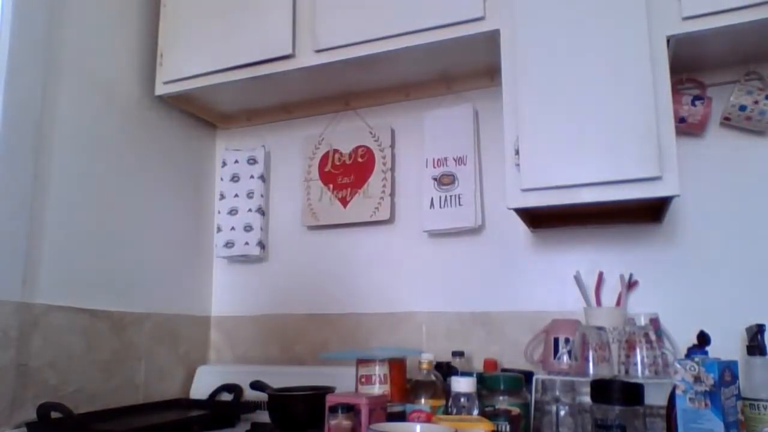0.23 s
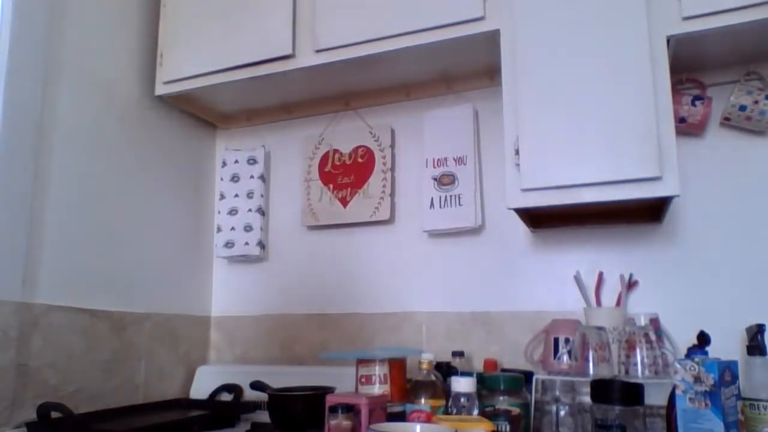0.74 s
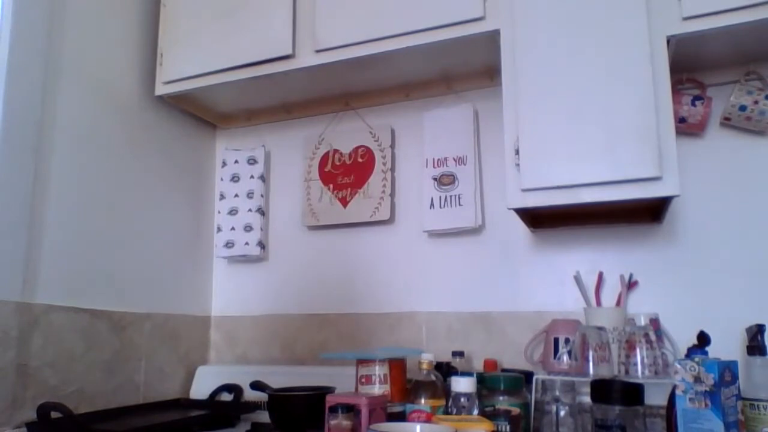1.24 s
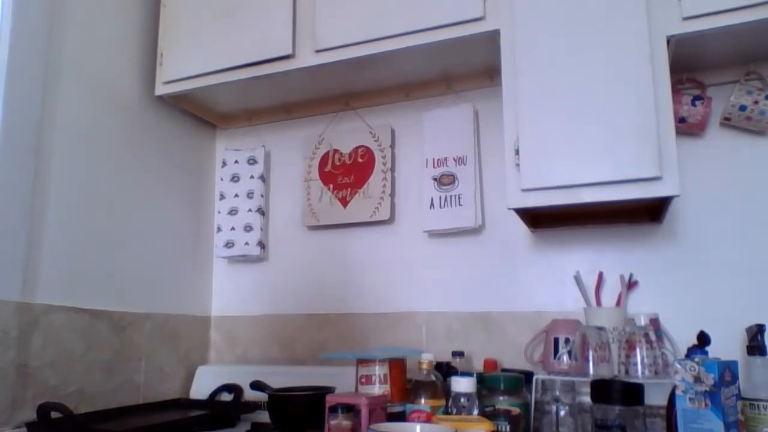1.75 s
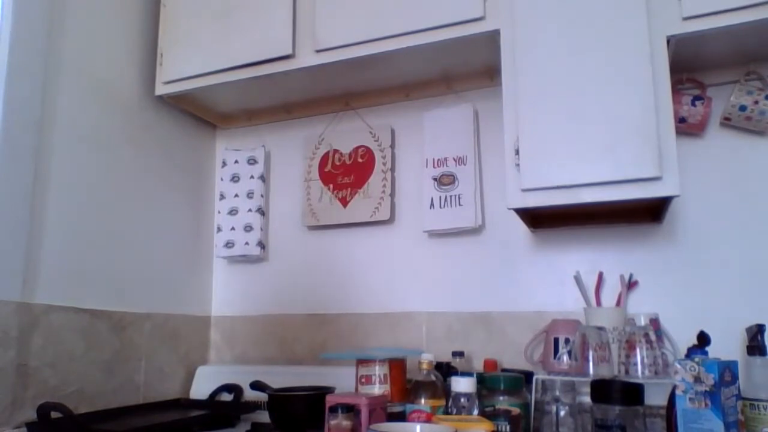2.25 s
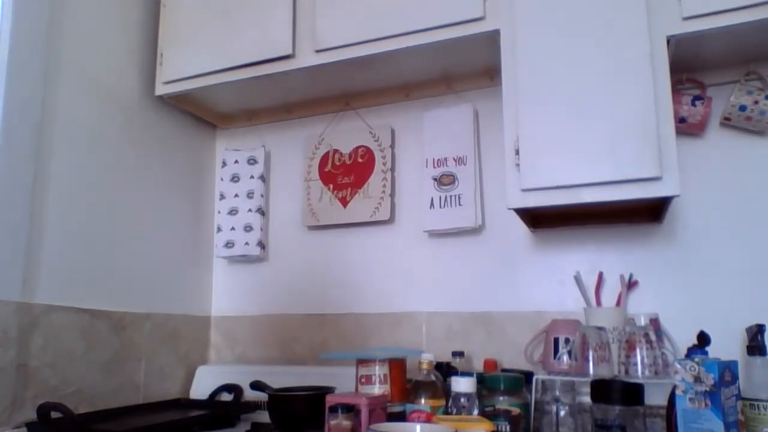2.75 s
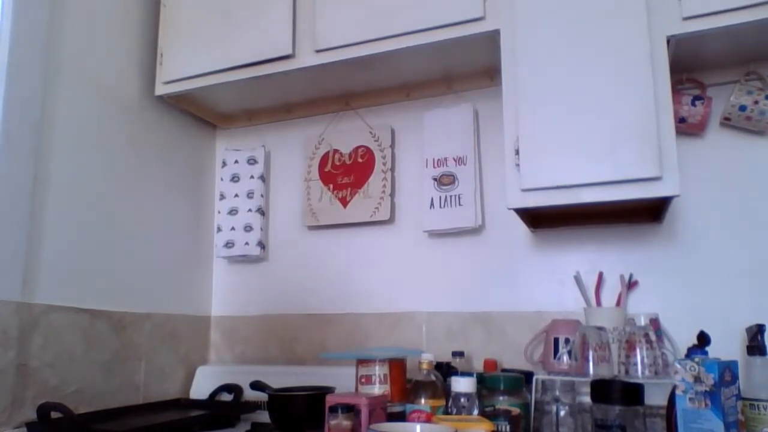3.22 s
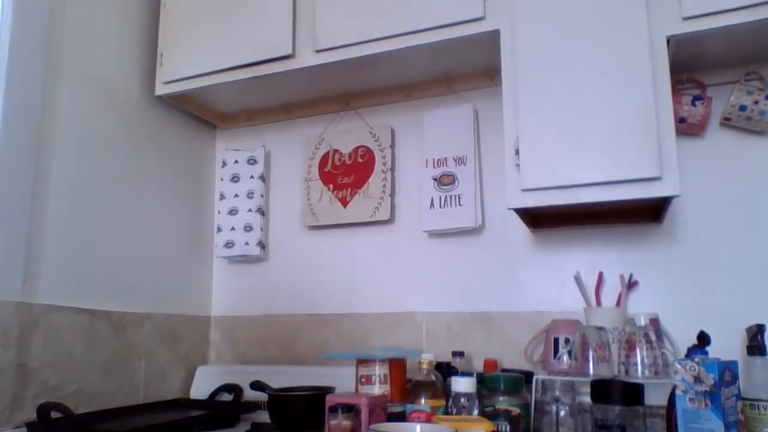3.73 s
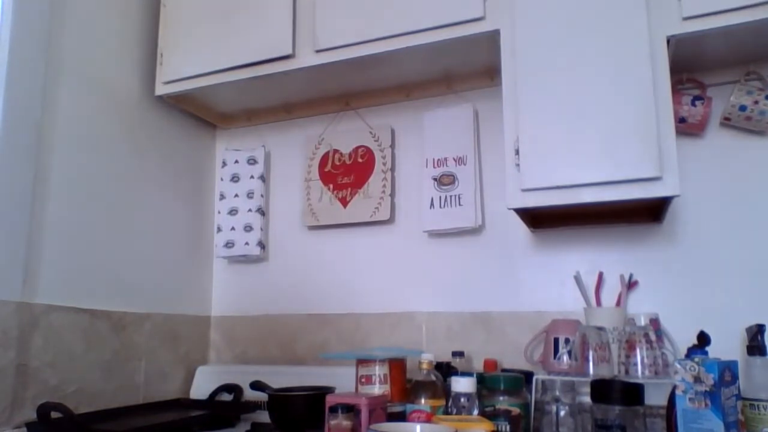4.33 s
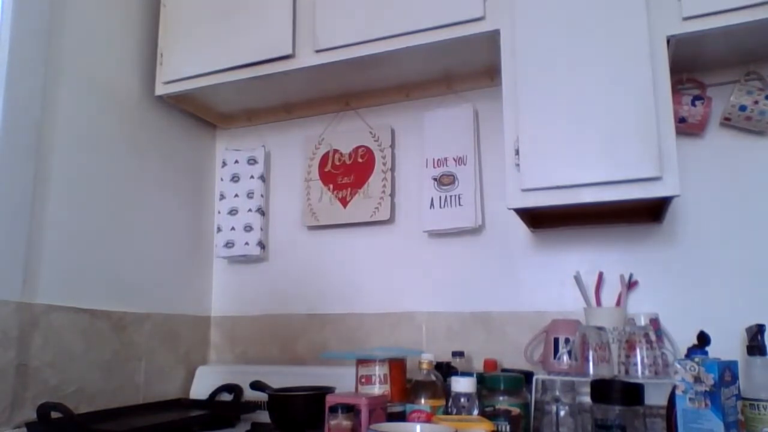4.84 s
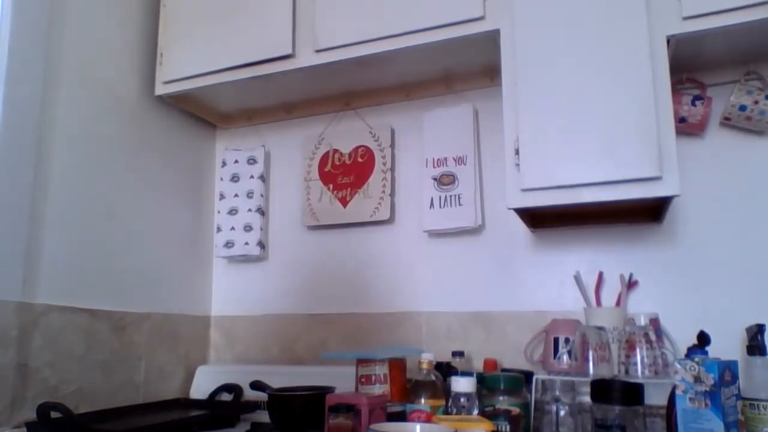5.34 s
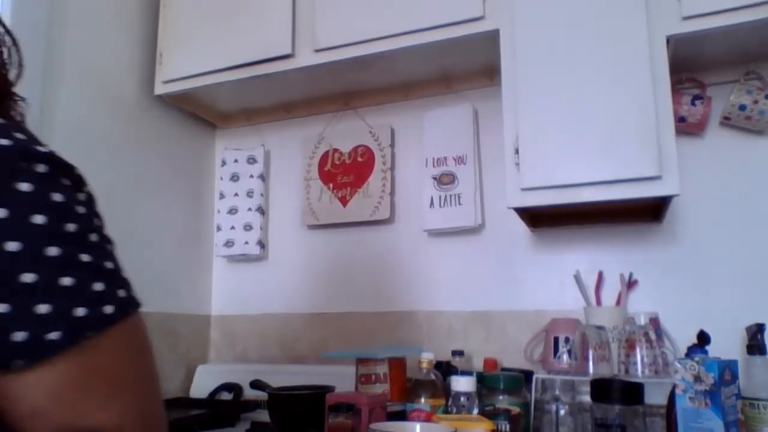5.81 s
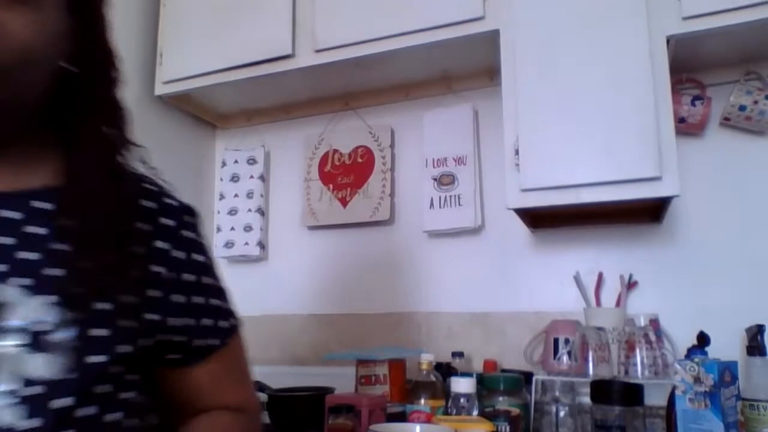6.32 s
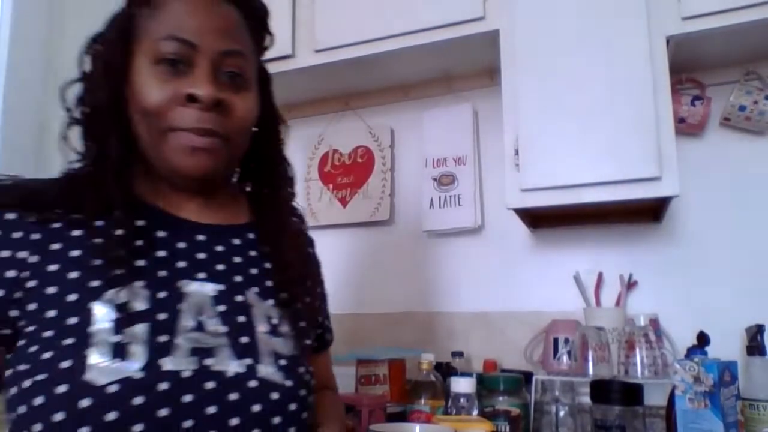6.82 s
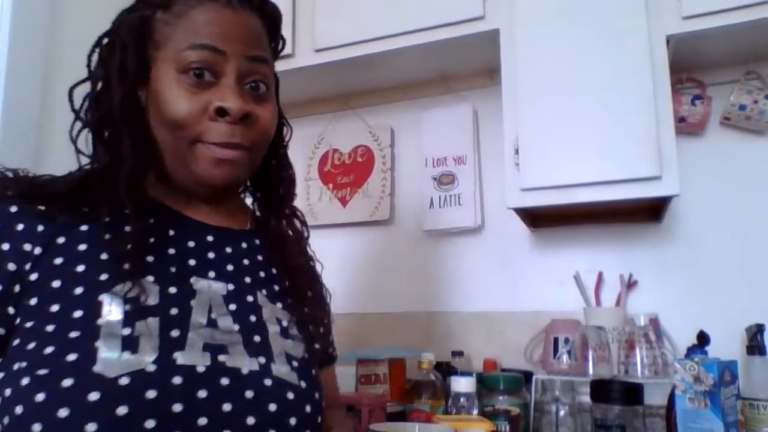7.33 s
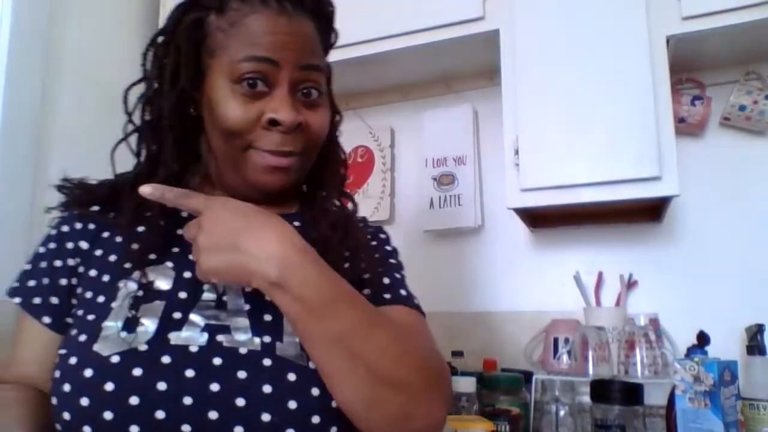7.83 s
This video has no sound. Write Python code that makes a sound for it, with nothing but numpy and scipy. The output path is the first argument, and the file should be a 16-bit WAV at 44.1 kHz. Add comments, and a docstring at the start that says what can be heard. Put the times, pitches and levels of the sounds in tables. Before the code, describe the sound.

Close to a laptop microphone in a hard-walled kitchen with faint rumble, hiss and hum. At 0 s the tail of a jar's drag across the counter fades and stops by 0.3, with a sharp hollow knock at 0.25 and smaller ones to 0.55. Near quiet follows, then soft taps and thuds from 1.3 to 2.2 as the jar is nudged and twisted, a faint tap at 2.9 and a snap at 3.45. At 3.8 a switch clunks and the blender starts, drumming and whirring up to a high whine by 4.8. At 5.0 ice jams the blades: pitch drops, with a heavy growling crunch around 5.25 and a counter thump at 5.5. Rattling, splintering ice continues; the motor races freer around 6.3 to 6.6, bogs into the loudest, distorted crashes near 7.1, recovers by 7.5, crunches again at 7.7 and runs on, rising, to the end at 8.

```python
"""A blender on a kitchen counter, close to a laptop's microphones: shaft tones, slot whine, fan noise and ice, all
tied to one shaft whose speed falls and rises as the churn swells and thins. Before the motor starts, the jar drags,
then knocks as it is set down, nudged and twisted on: bursts of noise ring the jar, thud and snap.
Hard walls answer with a decaying tail, over rumble, hiss and a faint hum; a side layer, mainly treble, widens
the stereo, and the loudest moments overload the input."""
import sys
import numpy as np
from scipy import signal
from scipy.fft import rfft, irfft, next_fast_len
from scipy.io import wavfile
from scipy.ndimage import map_coordinates

SR = 44100
rng = np.random.default_rng(int(sys.argv[2]) if len(sys.argv) > 2 else 0)


def bounce(signal):
    """Save signal as a 16-bit WAV file at the path given by the first command-line argument."""
    frames = np.transpose(np.atleast_2d(signal))
    limited = np.clip(frames, -1, 1)
    pcm = np.round(limited * 32767).astype(np.int16)
    wavfile.write(sys.argv[1], SR, pcm)


N = 355887
T = np.arange(N) / SR

# still kitchen and microphone hiss: (frequency [Hz], relative density [dB per Hz])
AIR_SPECTRUM = [(8.8, -30), (15, 4), (48, -1.5), (97, -10), (429, -15.5), (704, -21.5), (839, -22),
                (943, -24), (1380, -24), (2260, -32.5), (6280, -37), (14600, -34.5), (16000, -38)]
# a far appliance: (frequency [Hz], level [dB, scales the sine's peak])
HUM_TONES = [(285, -67), (431, -78), (829, -67)]
# the jar dragging on the counter: (frequency [Hz], relative density [dB per Hz])
DRAG_SPECTRUM = [(71, -46), (120, -21), (231, -3.5), (418, -16.5), (512, -11), (668, -22), (745, -15),
                 (1190, -19.5), (1550, -18.5), (5000, -43), (6500, -38), (11000, -120)]
# knocks of jar, lid and switch: (time [s], level driving the jar [dB], thud against it [dB],
# snap against it [dB], pitch of ring [Hz], pitch of thud [Hz])
HANDLING_KNOCKS = [(0.231, -31, -4, -20, 1500, 332), (0.242, -14.5, -7.5, -24, 1730, 350),
                   (0.259, -19.5, -22, -20, 1030, 330), (0.351, -26, 3, -33.5, 950, 324),
                   (0.461, -27.5, 0.5, -37, 1120, 430), (0.514, -34, 6.5, -14, 3150, 267),
                   (0.542, -45, -1, 1, 3500, 260), (1.319, -48, -10, -15, 1800, 400),
                   (1.504, -39.5, 5.5, -19, 1210, 477), (1.599, -45, 4, -18, 1480, 490),
                   (1.76, -40.5, 1, 11, 1390, 450), (1.866, -41.5, -6, -17, 1440, 400),
                   (2.016, -40, -11, -15, 1610, 400), (2.104, -39, 2, -16, 1490, 300),
                   (2.124, -36.5, 8.5, -24, 1410, 271), (2.159, -34, -1, -14, 1350, 463),
                   (2.219, -44, -13, -16, 1090, 400), (2.861, -44, -5, -16, 750, 500),
                   (3.45, -36.5, -9, -1, 1560, 400), (3.807, -22, 1.5, -17, 1300, 307)]
# big lumps of ice strike the jar: (time [s], level driving the jar [dB], thud against it [dB], snap against it [dB])
ICE_LUMPS = [(3.959, -21, -2, -25), (4.019, -21, -4, -13), (4.279, -24.5, 6.5, -24), (5.214, -8, -18, -35),
             (5.455, -9, -20, -22), (5.564, -10, -31, -7), (5.628, -12, -18, -22), (5.864, -11, -1, 0),
             (5.933, -22, -10, 1), (6.356, -15, -15, -22), (6.657, -19, -7, -1), (7.01, -9.5, -2, -14),
             (7.121, -0.5, -1, -32), (7.157, 3.5, -24, -18), (7.261, -12, -4, -6), (7.312, -16, -10, -9),
             (7.559, -14, -8, -18), (7.649, -5.5, -7, -19), (7.776, -6, -6, -20)]
# pitch when ice strikes: (ring [Hz], thud [Hz])
LUMP_PITCHES = (1320, 318)
# time for a contact to fall 60 dB: ring, thud, snap [s]
CONTACT_T60 = [0.14, 0.16, 0.023]
# resonances of jar and base: (frequency [Hz], width [Hz], gain [dB])
JAR_MODES = [(172, 32, -4.5), (304, 18.4, 2.5), (390, 93, -10), (578, 180, -0.5), (668, 73, 1.5),
             (800, 170, -2.5), (1080, 53, -2), (1140, 34, -0.5), (1467, 64, -6.5), (1618, 153, -4.5),
             (2070, 450, -2.5), (2224, 450, -1.5), (3710, 980, -23.5)]
# decay of the walls' answer: (frequency [Hz], time to fall 60 dB [s])
KITCHEN_T60 = [(150, 0.41), (1000, 0.36), (4000, 0.33), (12000, 0.19)]
# side layer: (frequency [Hz], gain [dB])
SIDE_GAIN = [(100, -56.5), (3000, -57.5), (6000, -57.5), (9000, -10), (16000, 5)]
# shaft speed before its small jitter: (time [s], turns a second [Hz])
SHAFT_SPEED = [(3.85, 96.3), (4.07, 139.3), (4.28, 160), (4.42, 163.9), (4.6, 185.3), (4.82, 191.5),
               (4.93, 188.3), (5.07, 150.8), (5.14, 143.6), (5.3, 143), (5.45, 166.8), (5.62, 167.5),
               (5.83, 177.3), (5.97, 162.8), (6.07, 178.1), (6.3, 195.8), (6.42, 186.2), (6.6, 197.4),
               (6.7, 193.7), (6.84, 167), (6.97, 165.7), (7.14, 148.3), (7.21, 146.8), (7.37, 176.5),
               (7.49, 192.6), (7.59, 183.1), (7.69, 169.5), (7.78, 160), (7.87, 163.8), (8.07, 192.4)]
# steady churn of the ice: (time [s], grinding level [dB])
ICE_CHURN = [(3.8, -36), (3.98, -27), (4.26, -30), (4.65, -28), (4.9, -26), (5.1, -13), (5.37, -22),
             (5.62, -19), (5.75, -20), (6.0, -22.5), (6.28, -25.5), (6.5, -23), (6.8, -19), (7.0, -19),
             (7.25, -26.5), (7.46, -23), (7.7, -17.5), (8.07, -20.5)]
# ice jams the blades: (start of full force [s], grinding level [dB], build-up time constant [s], hold [s])
ICE_JAMS = [(5.02, -19.5, 0.032, 0.026), (5.108, -31, 0.061, 0.043), (5.232, -4.5, 0.029, 0.047),
            (5.324, -18.5, .01, 0.0069), (5.469, -12.5, 0.047, 0.028), (5.572, -15, .015, 0.014),
            (5.63, -18, 0.034, 0.022), (5.87, -18.5, 0.008, .02), (5.951, -14.5, .015, 0.015),
            (6.384, -17.5, 0.044, 0.032), (6.726, -20, 0.076, .02), (6.909, -16.5, 0.058, 0.013),
            (7.07, -10.5, 0.069, .07), (7.155, -9, .015, .03), (7.72, -11.5, .08, 0.021),
            (7.782, -19, .015, .015), (7.87, -18, 0.029, 0.0079)]
# how lopsided the ice sits on the blades: (time [s], relative level [dB])
LOPSIDED_ICE = [(3.9, -9), (4.15, -11), (4.29, -3.5), (4.45, -8.5), (4.92, -1.5), (5.02, 6.5), (5.14, 5.5),
                (5.3, -1), (5.49, 4), (5.73, -2), (5.85, -2.5), (5.95, -0.5), (6.05, -6.5), (6.3, -18),
                (6.42, -7), (6.55, -5.5), (6.82, -6), (6.97, 8), (7.14, 9.5), (7.25, -2), (7.45, -13.5),
                (7.6, 2), (7.73, 1.5), (7.9, -2.5), (8.07, -23)]
# shake of the base: (frequency [times a turn], level before mount and waver [dB],
# growth [dB per dB of lopsidedness])
SHAKE_ORDERS = [(1, -31, 0.52), (2, -25, 1.0), (3, -30.5, .5)]
# higher shaft orders that follow the grinding: (frequency [times a turn], level against the grinding [dB])
BLADE_ORDERS = [(4, -14), (5, -20), (6, -14.5), (7, -15.5), (8, -15.5), (9, -18.5), (10, -17.5), (11, -20)]
# how well the base sounds a shake: (frequency [Hz], gain [dB])
MOUNT_GAIN = [(100, -15), (140, -7), (170, 0.5), (195, 1.5), (280, -2), (325, 3), (350, -2), (390, -3.5),
              (450, -8), (520, -5.5), (590, 3.5), (665, 3), (770, -11.5), (850, -8), (1020, 4), (1100, 0),
              (1350, 3), (1500, -3.5), (2200, 4.5)]
# rotor slot whine: (multiple of the slot rate, level before housing and waver [dB])
WHINE_ORDERS = [(1, -39), (2, -50), (3, -57), (4, -60), (5, -69), (6, -68), (7, -68)]
# how well the housing sounds a whine: (frequency [Hz], gain [dB])
HOUSING_GAIN = [(1300, -14), (1750, -2), (2050, -1), (2400, 1), (3600, -6), (3850, 7), (4330, 7),
                (4450, -4), (4800, 0), (5050, 11), (5830, 11), (5950, -4), (7000, -1), (8400, -3),
                (9000, 6), (9400, -3), (16000, -3)]
# brushes and cooling fan: (frequency [Hz], relative density [dB per Hz])
FAN_SPECTRUM = [(1000, -10), (1900, 1.5), (2120, -1), (2270, -9), (2450, -40), (3000, -75), (6000, -20),
                (9900, -20), (10300, -8), (10700, -21.5), (16000, -16)]
# broad clatter of the jar wall: (frequency [Hz], relative density [dB per Hz])
WALL_SPECTRUM = [(240, -25.5), (400, 7), (824, -14), (1050, 4), (1260, 0.5), (1370, 5.5), (1510, -4),
                 (4000, -21.5), (5200, -14.5), (8800, -120)]
# drumming of base and counter: (frequency [Hz], relative density [dB per Hz])
BASE_SPECTRUM = [(53, -54), (90, -28), (167, -4.5), (231, -8.5), (318, 3.5), (367, -4), (437, -36),
                 (600, -11), (780, -12.5), (1320, -120)]
# splintering ice: (frequency [Hz], relative density [dB per Hz])
SPLINTER_SPECTRUM = [(1470, 1), (2500, -10), (2850, -22.5), (3740, -4.5), (7230, -11), (8130, -8),
                     (15100, -18), (16000, -9.5)]
# the counter jolts: (time [s], level before the thump band and its gain [dB])
COUNTER_THUMPS = [(5.25, -33), (5.516, -12.5), (5.869, -32)]

AIR_DB = -50.5
DRAG_DB, DRAG_FADES_DB_PER_S, DRAG_ENDS_S = -36, 52, 0.33

FOCUS, LUMP_FOCUS = .28, .35  # reach of a contact's band, in shares of its pitch: handling, ice
# rise of a hard contact [s]; its slowing per dB below the hard level [dB per dB]; the hard level [dB]
RISE_S, SOFTER_DB, HARD_DB = 0.00043, 0.79, -14.5

START_S, ON_S, SPIN_UP_S = 3.795, 0.0053, .25  # switch closes; noise comes up; tones come up
JITTER = 0.00622  # scale of the random shaft jitter, as a share of the speed
SLOTS = 12  # rotor slots
JAM_FALL_S = 0.013  # time constant as a jam lets go
MID_DB = -20  # grinding level at which the load is zero
BLADES_GROW = 0.13  # dB gained per dB of lopsidedness
BUZZ = .35  # scale of fast phase jitter [radians], grows with the root of the slot multiple
HOWL_DB, HOWL_GROWS, HOWL_WIDTH_HZ = -31.5, 0.39, 300  # level before housing; dB per dB of load; knot rate
FAN_DB = -32.5  # at top speed
CHIPS_PER_S, CHIP_SPREAD_DB, CHIP_DB = 250, 1.5, -11  # chip level is against the grinding
DRUM_DB, DRUM_GROWS = -28, 0.79  # level at zero load; dB per dB of load
DRY_DB, DRY_S = 9.5, 0.71  # extra drumming while the ice is still dry and loose; how soon it fades
SPLINTER_DB, SPLINTER_GROWS = -34.5, 1  # level at zero load; dB per dB of load

THUMP_T60 = 0.2203  # s
TOP_HZ = 15900  # band limit of the input


def amp(db):
    """dB to gain."""
    return 10 ** (np.asarray(db) / 20)


def unit(x):
    """x at rms 1."""
    return x / np.sqrt(np.mean(x ** 2) + 1e-20)


def along(points, hz):
    """(frequency [Hz], value) points on a log axis."""
    f, v = np.transpose(points)
    return np.interp(np.log(hz + 1), np.log(f + 1), v)


def curve(rows):
    """(time [s], value) points as one value per sample."""
    s, values = np.transpose(rows)
    return np.interp(T, s, values)


def wobble(rate):
    """A smooth random curve, rate knots a second."""
    return map_coordinates(rng.standard_normal(int(N * rate / SR) + 4), [T * rate])


def filtered(x, response):
    """x times a complex response of frequency."""
    m = next_fast_len(N + SR // 2)
    return irfft(rfft(x, m) * response(np.fft.rfftfreq(m, 1 / SR)), m)[..., :N]


def coloured(x, spectrum):
    """x through a spectrum, at rms 1."""
    return unit(filtered(x, lambda hz: amp(along(spectrum, hz))))


def band(x, lo_hz, hi_hz, order=2):
    """A causal band-pass."""
    return signal.sosfilt(signal.butter(order, [lo_hz, hi_hz], "band", fs=SR, output="sos"), x)


def air():
    """Rumble, hiss and a faint hum that wavers in level and phase."""
    hum = sum(amp(db + 2.8 * wobble(20)) * np.sin(2 * np.pi * hz * T + 1.9 * wobble(13))
              for hz, db in HUM_TONES)
    level = amp(AIR_DB + 0.7 * wobble(5.19))
    return level * coloured(rng.standard_normal(N), AIR_SPECTRUM) + hum


def slide():
    """The last of a drag across the counter: fading friction noise that stops short."""
    level = amp(DRAG_DB - DRAG_FADES_DB_PER_S * T) * (T < DRAG_ENDS_S)
    return level * coloured(rng.standard_normal(N), DRAG_SPECTRUM)


def jar(f):
    """The causal response of the jar's resonances, with alternating signs."""
    return sum((-1) ** k * amp(db) * 1j * f * width / (centre * centre - f * f + 1j * f * width)
               for k, (centre, width, db) in enumerate(JAR_MODES))


def knocks():
    """Each contact of handling or ice is a short rattle that rings the jar, thuds and snaps."""
    t = np.arange(SR // 3) / SR
    push = np.zeros((3, N + SR))  # ring, thud, snap
    contacts = [(*row, FOCUS) for row in HANDLING_KNOCKS]
    contacts += [(*row, *LUMP_PITCHES, LUMP_FOCUS) for row in ICE_LUMPS]
    for s, db, thud_db, snap_db, ring_hz, thud_hz, focus in contacts:
        ring, thud, snap = rng.standard_normal((3, len(t)))
        ring = unit(band(ring, ring_hz / (1 + focus), ring_hz * (1 + focus), order=1))
        thud = unit(band(thud, thud_hz / (1 + focus), thud_hz * (1 + focus), order=1))
        decay = amp(db - 60 * t / np.array(CONTACT_T60)[:, None])
        rise_s = RISE_S * amp(SOFTER_DB * max(HARD_DB - db, 0))  # gentler contacts rise more slowly
        rattle = decay * (1 - np.exp(-t / rise_s))
        balance = amp([[0], [thud_db], [snap_db]])
        push[:, round(s * SR):][:, :len(t)] += balance * rattle * [ring, thud, snap]
    body = amp(0.5) * push[0, :N] + amp(1.0) * push[1, :N]
    snaps = band(push[2, :N], 2400, 11300, order=1)
    return filtered(body, jar) + amp(-9.5) * body + amp(-4) * snaps


def kitchen(x):
    """The hard walls' answer, 200 samples late: a noise tail whose frequencies die at their own speeds."""
    hz, t, z = signal.stft(rng.standard_normal(SR // 2), SR, nperseg=256)
    decay = amp(-60 * t / along(KITCHEN_T60, hz)[:, None])
    tail = signal.istft(z * decay, SR, nperseg=256)[1]
    return signal.fftconvolve(np.pad(x, (200, 0)), tail / np.linalg.norm(tail))[:N]


def grinding():
    """Grinding level in dB: powers of steady churn and of jams that build up, hold and let go."""
    power = amp(2 * curve(ICE_CHURN))
    for s, db, build_s, hold_s in ICE_JAMS:
        away = np.maximum((s - T) / build_s, (T - s - hold_s) / JAM_FALL_S)
        power = power + amp(2 * db) * np.exp(-2 * np.maximum(away, 0))
    return 10 * np.log10(power)


def shaft_tone(turns, multiple, waver_db, buzz=0):
    """A sine locked to a multiple of the shaft's turns, wavering in level and jittering in phase."""
    level = np.sqrt(2) * amp(waver_db * wobble(25))
    return level * np.sin(2 * np.pi * (multiple * turns + rng.random()) + buzz * wobble(300))


def base_shake(turns, speed, lopsided_db):
    """Lopsided ice shakes the base at low multiples of the shaft speed."""
    return sum(amp(db + grows * lopsided_db + along(MOUNT_GAIN, k * speed))
               * shaft_tone(turns, k, waver_db=-0.44) for k, db, grows in SHAKE_ORDERS)


def blade_tones(turns, speed, grind_db, lopsided_db):
    """Higher shaft orders sound through the base as hard as the ice is ground."""
    orders = sum(amp(db + along(MOUNT_GAIN, k * speed)) * shaft_tone(turns, k, waver_db=3.5, buzz=0.28)
                 for k, db in BLADE_ORDERS)
    return amp(grind_db + BLADES_GROW * lopsided_db) * orders


def slot_whine(turns, speed, load_db):
    """Rotor slots whine at multiples of their rate; air chopped at that rate howls as a band of noise."""
    whine = sum(amp(db + along(HOUSING_GAIN, SLOTS * k * speed) + 4 * wobble(200))
                * shaft_tone(turns, SLOTS * k, waver_db=4.0, buzz=BUZZ * np.sqrt(k))
                for k, db in WHINE_ORDERS)
    phase = 2 * np.pi * SLOTS * turns
    chopped = unit(wobble(HOWL_WIDTH_HZ) * np.sin(phase) + wobble(HOWL_WIDTH_HZ) * np.cos(phase))
    howl_db = HOWL_DB + HOWL_GROWS * load_db + along(HOUSING_GAIN, SLOTS * speed)
    return whine + amp(howl_db) * chopped


def rubble(turns, depth, lumpy_db):
    """Noise of rms 1 that throbs twice a turn with the blades, in lumps of chance size."""
    passes = 1 + depth * np.cos(2 * np.pi * 2 * turns + wobble(20))
    return unit(passes * amp(lumpy_db * wobble(60)) * rng.standard_normal(N))


def fan_noise(turns, speed):
    """Brushes and cooling fan: noise that grows steeply with shaft speed."""
    level = amp(FAN_DB) * (speed / speed.max()) ** 3.7
    return level * coloured(rubble(turns, depth=0.13, lumpy_db=1.8), FAN_SPECTRUM)


def chips():
    """Single chips of ice: ticks of chance size, through the jar and direct, at rms 1."""
    ticks = rng.random(N) < CHIPS_PER_S / SR
    ticks = ticks * amp(CHIP_SPREAD_DB * np.clip(rng.standard_normal(N), -2, 2))
    return unit(band(filtered(ticks, jar) + amp(-17) * ticks, 630, 4800))


def ice_clatter(turns, grind_db):
    """Ground ice rings the jar, clatters broadly on its wall and ticks in single chips."""
    # the jar's ring loses its lows below about 600 Hz
    ring = unit(filtered(rubble(turns, depth=0.88, lumpy_db=-0.5),
                         lambda f: jar(f) * f ** 2 / (f ** 2 + 600 ** 2)))
    wall = coloured(rubble(turns, depth=0.51, lumpy_db=2.5), WALL_SPECTRUM)
    return amp(grind_db) * (amp(-5.0) * ring + amp(-6.0) * wall + amp(CHIP_DB) * chips())


def base_drumming(turns, load_db, since):
    """Base and counter drum with the load, stronger while the ice is still dry and loose."""
    drum_db = DRUM_DB + DRUM_GROWS * load_db + DRY_DB * np.exp(-(since / DRY_S) ** 2)
    return amp(drum_db) * coloured(rubble(turns, depth=0.46, lumpy_db=0.0), BASE_SPECTRUM)


def splintering(turns, load_db):
    """Bright noise of splintering ice that follows the load."""
    noise = coloured(rubble(turns, depth=0.1, lumpy_db=0.0), SPLINTER_SPECTRUM)
    return amp(SPLINTER_DB + SPLINTER_GROWS * load_db) * noise


def blender():
    """Motor and ice together, all tied to the turns of one shaft."""
    speed, lopsided_db = curve(SHAFT_SPEED), curve(LOPSIDED_ICE)
    grind_db = grinding()
    load_db, since = grind_db - MID_DB, T - START_S
    turns = np.cumsum(speed * (1 + JITTER * wobble(40))) / SR
    tones = base_shake(turns, speed, lopsided_db) + blade_tones(turns, speed, grind_db, lopsided_db)
    tones = tones + slot_whine(turns, speed, load_db)
    noise = fan_noise(turns, speed) + ice_clatter(turns, grind_db)
    noise = noise + base_drumming(turns, load_db, since) + splintering(turns, load_db)
    spin_up = np.clip(since / SPIN_UP_S, 0, 1)
    return np.clip(since / ON_S, 0, 1) * (spin_up * tones + noise)


def thumps():
    """Jolts of the whole counter: decaying noise bursts in a low band."""
    out, t = np.zeros(N + SR), np.arange(SR // 3) / SR
    for s, db in COUNTER_THUMPS:
        out[round(s * SR):][:len(t)] += amp(db - 60 * t / THUMP_T60) * rng.standard_normal(len(t))
    return amp(21.5) * band(out[:N], 93, 170)


def scene():
    """Both channels share one kitchen; a side layer, mainly treble, is added to one and subtracted from the other."""
    motor, hits = blender(), knocks()
    into_room = amp(-10.5) * motor + amp(-5.5) * hits
    side = filtered(kitchen(into_room), lambda hz: amp(along(SIDE_GAIN, hz)))
    direct = amp(-1.0) * motor + hits
    return direct + kitchen(into_room) + side * [[1], [-1]] + thumps() + slide() + air()


def record(dry):
    """The input saturates towards .97 of full scale and keeps nothing above its band limit."""
    clipped = dry / (1 + np.abs(dry / .97) ** 8) ** (1 / 8)
    return np.clip(filtered(clipped, lambda hz: hz < TOP_HZ), -1, 1)


dry = scene()
out = record(dry)
bounce(out)
```